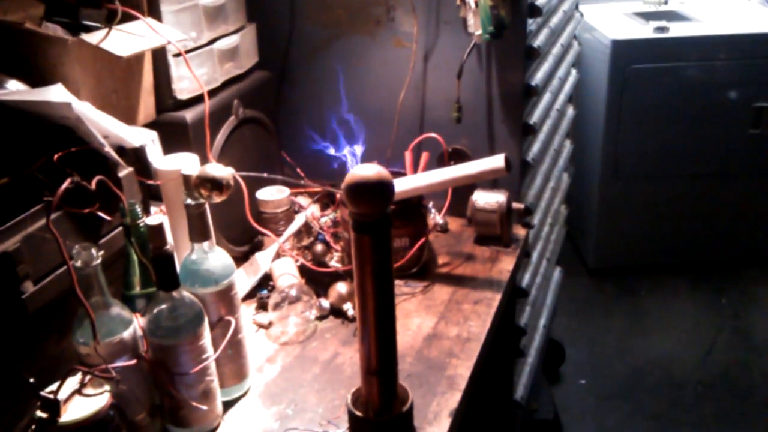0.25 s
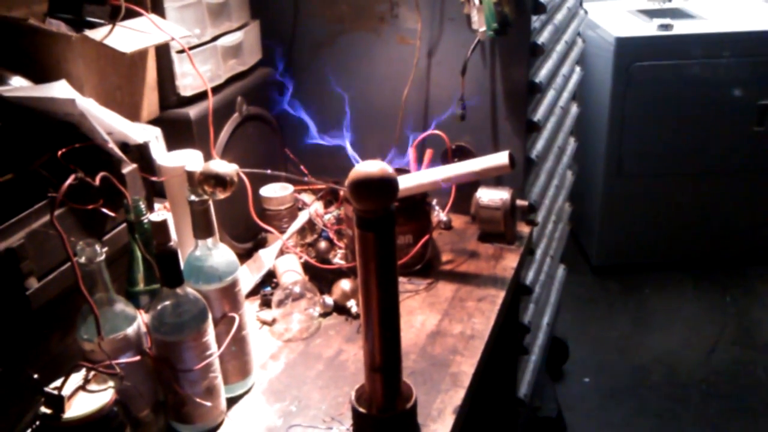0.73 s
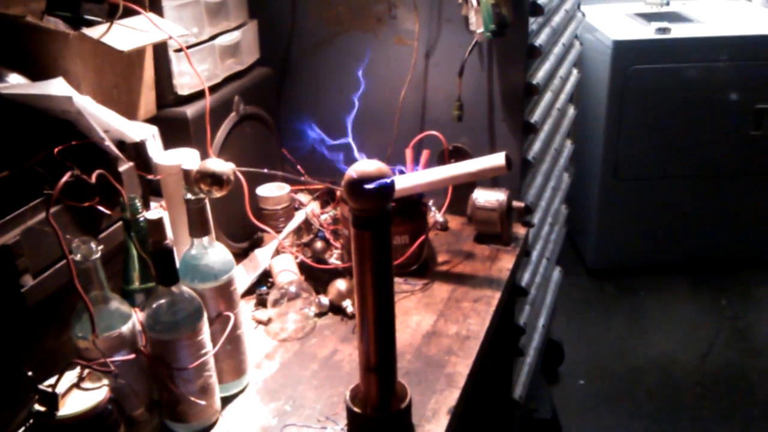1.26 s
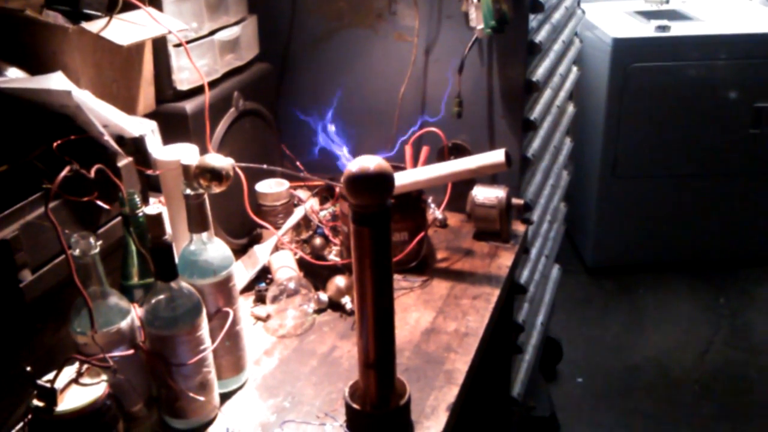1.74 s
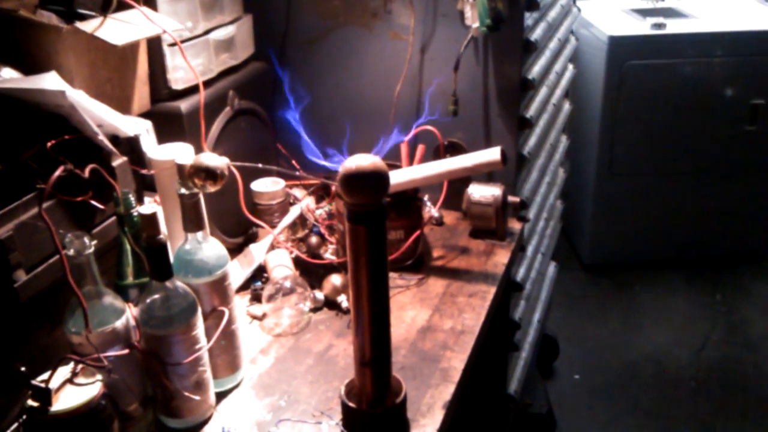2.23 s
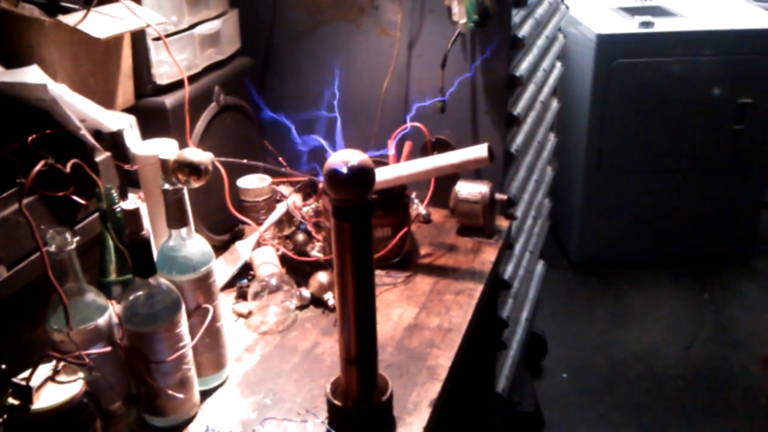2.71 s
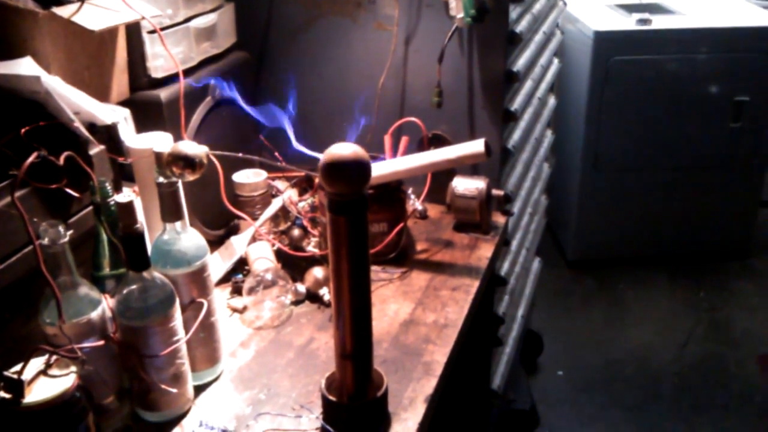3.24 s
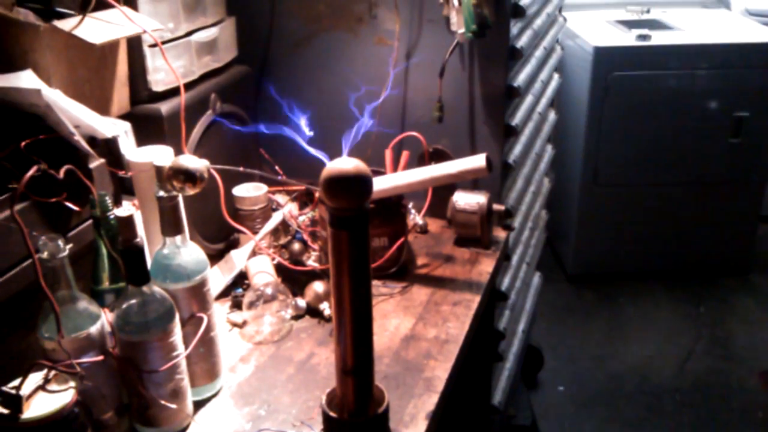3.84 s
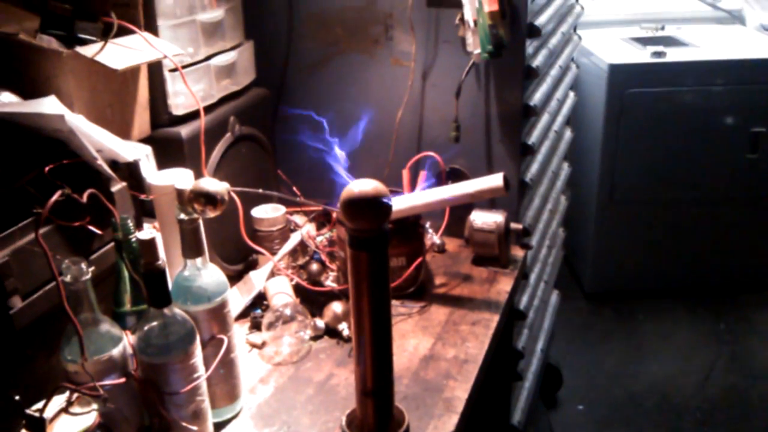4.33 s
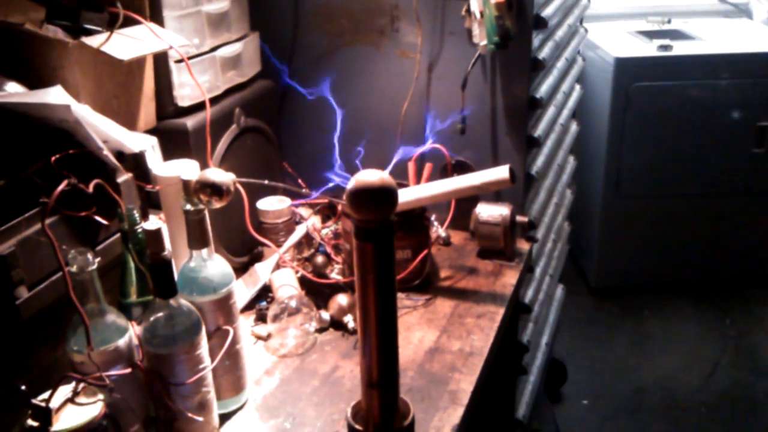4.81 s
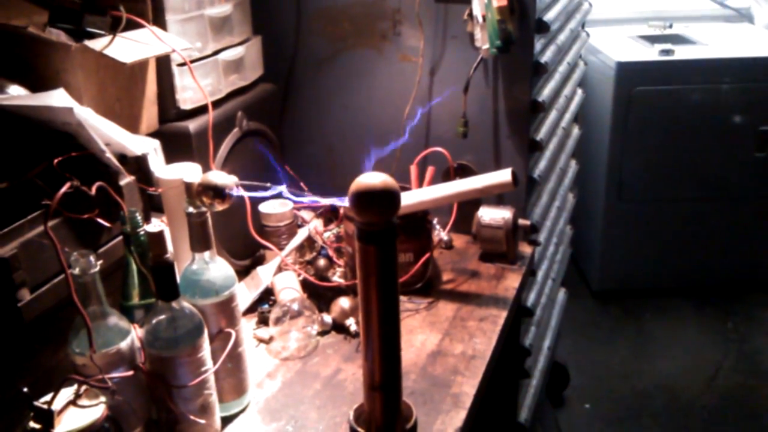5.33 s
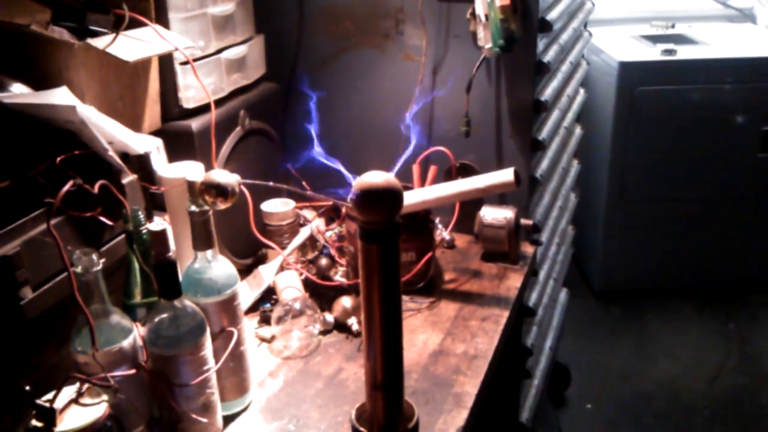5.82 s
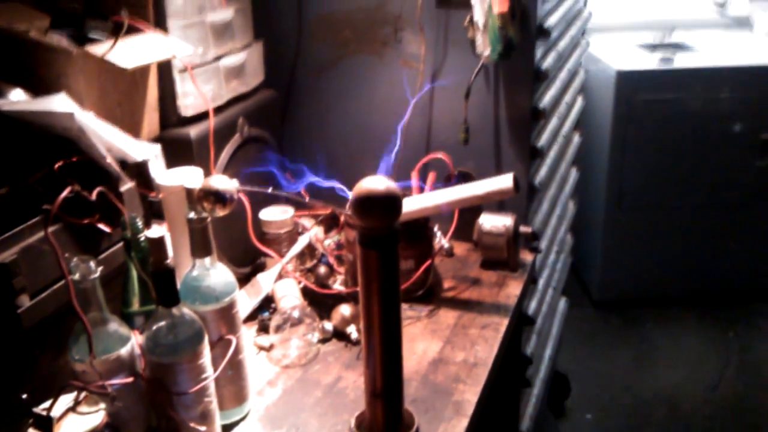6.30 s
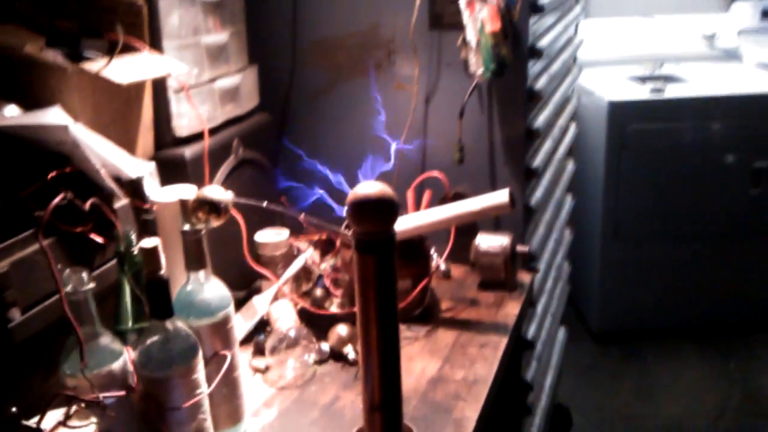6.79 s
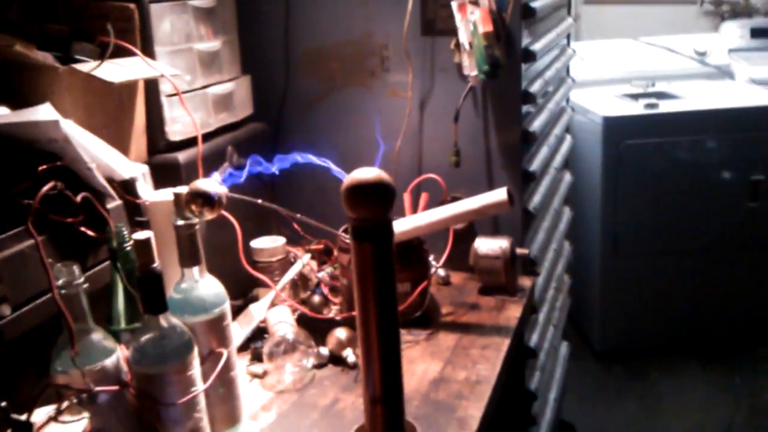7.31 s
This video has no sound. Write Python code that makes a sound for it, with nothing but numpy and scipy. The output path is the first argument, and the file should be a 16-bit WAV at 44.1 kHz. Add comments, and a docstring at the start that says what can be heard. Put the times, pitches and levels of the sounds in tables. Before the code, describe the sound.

Loud, sizzling electric arcs stream without a break from a nearby spark-gap coil in a workshop with a short, tight echo. A ragged, buzzing whine wavers within the hiss, sometimes racing for an instant, sometimes settling into a clearer tone. Irregular flares keep brightening the crackle, over faint knocking in the bench and a very faint hum. It is still running at the end.

```python
"""A small spark-gap coil runs on a workshop bench. From the start its gap fires unevenly, some 1400
times a second: a rasping whine. Each firing cracks along branching sparks in the air (streamers), making
a hiss, and missed firings knock in the bench over a faint rumble and hum. Streamers keep flaring up and
dying back. Just after half a second the gap briefly sings evenly, and at one second it briefly races.
Both come back now and then, and the longest even note comes near the end."""
import sys
import numpy as np
from scipy import signal
from scipy.fft import rfft, irfft, next_fast_len
from scipy.io import wavfile
from scipy.ndimage import uniform_filter1d

SR = 44100
rng = np.random.default_rng(int(sys.argv[2]) if len(sys.argv) > 2 else 0)


def unload_audio(sound):
    """Save the sound as a 16-bit wav file, at the path given as the first command line argument."""
    columns = np.transpose(np.atleast_2d(sound))
    # keep every value between -1 and 1, then stretch to whole-number steps
    steps = np.round(np.clip(columns, -1, 1) * 32767)
    wavfile.write(sys.argv[1], SR, steps.astype(np.int16))


N = 332955
TIME = np.arange(N) / SR

# how often the gap fires between flares: t/s, rate/Hz
FIRING_RATE = [(0, 1160), (.25, 1235), (.45, 1180), (.75, 1290), (1.1, 1370), (1.45, 1406), (1.7, 1527),
               (2.5, 1517), (2.72, 1340), (3.1, 1373), (4.1, 1290), (4.35, 1400), (5.1, 1346), (5.95, 1400),
               (6.05, 1540), (6.62, 1610), (7.0, 1437), (7.55, 1420)]
# how much the wait between firings varies: t/s, scatter/share of the wait
FIRING_SCATTER = [(0, 0.11), (.3, 0.086), (.65, .13), (.85, 0.077), (1.1, .12), (1.9, 0.097), (2.55, 0.093),
                  (2.9, 0.061), (3.5, 0.072), (4.3, .1), (4.95, .11), (5.12, 0.046), (5.5, .09),
                  (6.05, .12), (6.45, .1), (6.62, 0.059), (7.1, 0.077), (7.55, 0.059)]
# base loudness of the boom, the lower part of the whine: t/s, level/dB
BOOM_LEVEL = [(0.0, -28.5), (1.05, -25), (1.2, -29.5), (1.35, -24.5), (2.55, -27), (2.7, -37.5),
              (2.85, -32), (3.0, -20.1), (3.15, -30), (3.9, -25.5), (4.05, -30.5), (4.65, -26.5),
              (5.4, -29.5), (6.15, -32), (6.6, -23.5), (7.55, -25)]
# tone colour of the boom: f/Hz, level/dB
BOOM_SPECTRUM = [(500, -23), (900, -18), (1050, -6), (1250, -4), (1470, 1.5), (1680, 1), (1900, 1),
                 (2150, -3), (2500, -26), (4000, -62)]
# base loudness of the snap, the upper part of the whine: t/s, level/dB
SNAP_LEVEL = [(0.0, -29), (1.2, -24), (2.4, -30.5), (2.85, -26), (3.3, -30.5), (3.6, -24), (3.9, -27.5),
              (4.05, -26.5), (5.25, -29.0), (5.4, -26), (5.55, -30.5), (5.7, -24.5), (6.15, -36),
              (6.45, -26), (6.6, -33.5), (7.55, -25)]
# tone colour of the snap: f/Hz, level/dB
SNAP_SPECTRUM = [(1500, -36), (2100, -4), (2350, 1.5), (2620, 3), (2900, 1), (3200, -4.5), (3480, -9),
                 (3900, -7), (4600, -9), (5300, -9.5), (6200, -33), (9000, -50)]
# base loudness of the hiss: t/s, level/dB
HISS_LEVEL = [(0.0, -19), (1.05, -15.5), (1.2, -18), (1.5, -16), (1.65, -21), (3.6, -18.2), (3.75, -20.5),
              (3.9, -17.5), (4.2, -19.5), (5.7, -18.5), (5.85, -17), (6.0, -19.5), (6.9, -22),
              (7.55, -17.8)]
# tone colour of the hiss: f/Hz, level/dB
HISS_SPECTRUM = [(1500, -34), (3500, -16.5), (4900, -20), (5500, -9.5), (6100, -3.5), (6850, -0.5),
                 (7400, -2.5), (8300, 1.5), (9400, -6.5), (11500, -7), (13200, -12.5), (14300, -15),
                 (15000, -17), (16500, -19)]
# how much the thick branches stand out in the hiss: t/s, gain/dB
THICK_BRANCHES = [(0.0, 6), (0.45, 4.5), (0.6, 1.5), (1.95, 7.5), (2.55, -4.5), (2.7, 4.8), (4.05, -0.8),
                  (5.55, 3), (5.85, -8.5), (6.0, 0.7), (6.3, 3), (7.55, -4.5)]
# base loudness of the knocks of missed firings: t/s, level/dB
KNOCK_LEVEL = [(0, -50.5), (.7, -43.5), (1.15, -54), (1.5, -56), (2.2, -57.5), (3.2, -55.5), (3.37, -45),
               (3.6, -53), (4.3, -52.5), (5.15, -50.5), (5.55, -49.5), (5.92, -46), (6.1, -55), (6.45, -51),
               (6.65, -55.5), (7.05, -49), (7.2, -48), (7.55, -48)]
# tone colour of the knocks: f/Hz, level/dB
KNOCK_SPECTRUM = [(60, -35), (150, -29), (300, -10.5), (520, -5.5), (700, -3), (950, 8), (1300, 1.5),
                  (2500, -43)]
# notes at which the bench rings: f/Hz, width/Hz, level/dB
BENCH_RINGS = [(458, 40, 2.5), (587, 20, -6), (702, 48, 3.5), (770, 28, -5)]
# base loudness of the workshop's rumble: t/s, level/dB
RUMBLE_LEVEL = [(0, -78), (.35, -80), (.8, -67), (1.5, -78), (1.9, -75), (2.35, -73), (2.6, -75),
                (3.35, -68.5), (4.2, -72.5), (5.3, -70), (6.2, -71.5), (6.75, -68), (7.05, -77),
                (7.55, -65)]
# tone colour of the rumble: f/Hz, level/dB
RUMBLE_SPECTRUM = [(15, -12), (35, -4), (47, 1.5), (70, 1), (110, 1), (160, -1), (300, -6), (1000, -38)]
# loudness of the workshop's two tones: t/s, hum level/dB, whirr level/dB
HUM_AND_WHIRR_LEVELS = [(0, -88, -57), (.9, -78, -66), (1.7, -92, -59.5), (3, -86, -64), (5.5, -87, -72),
                        (6.5, -67, -74), (7.1, -72, -77), (7.55, -72, -77)]
# pitch of the whirr: f/Hz, width/Hz
WHIRR_BAND = (450, 43)
# what a flaring streamer adds: start/s, length/s, rate/Hz, hiss/dB, boom/dB, snap/dB, thick branches/dB
STREAMER_FLARES = [(-0.02, 0.15, 90.0, 3.5, 0.7, 5, 2), (0.227, 0.055, -0.0, 3, -2.5, -0.5, 2),
                   (0.472, 0.059, 30.0, -0.9, 1.5, 4, 0), (0.567, 0.095, -30.0, -0.6, 2, 4, 0),
                   (0.699, 0.065, -80.0, -0.3, 2.5, 1, 1), (0.808, 0.1, 0.0, 3.0, 3.5, 0.5, 4),
                   (1.227, 0.039, -50.0, 5.5, 1.5, 0.5, -1), (1.378, 0.14, -70.0, 0, -3.6, 1, 2),
                   (1.709, 0.068, 20.0, 2.5, 1.5, 0.5, 2), (1.914, 0.11, -20.0, 4, 0.2, 3.5, -0.5),
                   (2.022, 0.14, -40.0, 4.5, 0, 3.5, 0), (2.291, 0.094, -40.0, 4.5, -2.2, 1.0, 4.5),
                   (2.687, 0.13, 80.0, 3.5, 8, 1.5, -3), (2.873, 0.089, -10.0, 1.7, -2.2, 3.5, -6),
                   (2.965, 0.086, -20.0, 2.4, -4.5, 3.5, 1.4), (3.109, 0.074, 30.0, 4.5, 7.5, 7.5, 4),
                   (3.284, 0.17, 30.0, 3.5, 7.5, 3, 7), (3.569, 0.12, 90.0, 1.8, 3, 0.3, 4),
                   (3.751, 0.093, -30.0, 2.5, 2.3, 7.5, 7), (3.978, 0.077, 90.0, 3, 4.3, 3.9, 2),
                   (4.239, 0.048, 60.0, 2, 3.7, 1.5, 2), (4.442, 0.064, 30.0, 3.5, 4.1, 4.5, -7),
                   (4.662, 0.049, 10.0, 6.5, 4, 3.5, -3), (4.79, 0.085, 0.0, 3.9, 1, 3.2, -2),
                   (4.89, 0.095, -40.0, 2.5, 2.8, 4, 1), (5.048, 0.12, -20.0, 2.9, 5, 6.5, -4.5),
                   (5.239, 0.14, 30.0, 4.5, 3, 0, -5), (5.66, 0.1, 10.0, -1.6, 4, 0.2, 4),
                   (5.812, 0.15, -59.5, 4, 4, 6.5, 4.5), (6.084, 0.11, -30.0, 5.5, 6, 9, -3),
                   (6.374, 0.13, 49.5, 6, -0.3, 0.2, -8.5), (6.918, 0.049, -50.5, 7.5, 2.2, 6.5, 5.3),
                   (7.001, 0.17, -10.0, 4.5, 1, 0.3, 4), (7.224, 0.159, -30.5, 2.0, -2.5, 3.5, 0),
                   (7.43, 0.049, -7, 1.8, -2, 6.5, 4)]
# the gap settles to an even beat and sings: start/s, length/s, rate/Hz
EVEN_SPELLS = [(.56, 0.043, 1210), (2.009, 0.096, 1470), (2.62, 0.058, 1290), (2.831, 0.095, 1333),
               (3.359, 0.095, 1310), (3.471, 0.051, 1270), (3.749, .05, 1350), (4.879, 0.059, 1330),
               (5.051, .13, 1310), (5.27, .1, 1270), (6.338, .15, 1295), (6.93, 0.081, 1416),
               (7.229, .3, 1412)]
# the gap races and fires raggedly: start/s, length/s, extra rate/Hz, extra boom/dB
RACING_SPELLS = [(1.05, 0.074, 171, 3.5), (3.92, .05, 150, 0), (4.29, .06, 83, -2.5),
                 (5.2, 0.059, 128, 1.5), (6.15, 0.067, 90, 2.5), (6.27, 0.059, 39, 3.5),
                 (7.13, 0.083, 169, 3.5)]


def from_db(db):
    """Turn decibels into a number to multiply by."""
    return 10 ** (np.asarray(db) / 20)


def unit_level(x):
    """Scale a sound so its average level (rms) is 1."""
    return x / np.sqrt(np.mean(x ** 2) + 1e-20)


def in_time(rows):
    """Join a table's points with straight lines, giving a value at every sample."""
    seconds, *columns = np.transpose(rows)
    return np.squeeze([np.interp(TIME, seconds, column) for column in columns])


def drift(speed_hz):
    """Smooth random wandering with a typical size of 1."""
    step, warm_up = 40, 2000
    memory = np.exp(-2 * np.pi * step * speed_hz / SR)
    noise = rng.standard_normal(N // step + warm_up + 2)
    slow = signal.lfilter([1], [1, -2 * memory, memory * memory], noise)[warm_up:]
    return np.interp(np.arange(N) / step, np.arange(len(slow)), unit_level(slow))


def colour(x, spectrum):
    """Give a sound a tone colour that fades beyond the table's ends; its level comes out as 1."""
    size = next_fast_len(N + SR // 10)
    hz, db = np.transpose(spectrum)
    f = np.maximum(np.arange(size // 2 + 1) * SR / size, 1)
    gain = from_db(np.interp(np.log(f), np.log(hz), db))
    edge_fade = np.minimum(f / hz[0], 1) ** 2 * np.minimum(hz[-1] / f, 1) ** 2
    return unit_level(irfft(rfft(x, size) * gain * edge_fade, size)[:N])


def steady(x, samples):
    """Hold the slow level at 1 and keep the fast flutter."""
    return x / np.sqrt(uniform_filter1d(uniform_filter1d(x ** 2, samples), samples) + 1e-12)


def clicks(times, heights):
    """A row of clicks at the given seconds."""
    at = np.round(times * SR).astype(int)
    inside = (at >= 0) & (at < N)
    return np.bincount(at[inside], heights[inside], N)


def resonance(x, hz, width_hz):
    """Ring at one pitch; a narrower width rings longer."""
    return signal.lfilter(*signal.iirpeak(hz, hz / width_hz, SR), x)


def gap_firings(rate_hz, scatter, count=13000, sway_share=.5, sway_hz=70, lapse_share=.62, fitful=.9):
    """The capacitor charges until a spark jumps the gap; a longer wait stores a stronger spark."""
    # hot gas lingers in the gap, so whole runs of firings come early or late together
    charge = np.cumsum(rate_hz * np.exp(sway_share * scatter * drift(sway_hz))) / SR
    # most firings keep in step, a few slip badly: the whine turns ragged
    lapse = lapse_share * np.minimum(np.exp(fitful * rng.standard_normal(count) - fitful ** 2 / 2), 5)
    spread = np.interp(np.arange(count), charge, scatter) * lapse
    waits = np.exp(spread * rng.standard_normal(count) - spread ** 2 / 2)
    times = np.interp(np.cumsum(waits), charge, TIME, right=TIME[-1] + 1)
    return times, np.sqrt(waits)


def workshop_echo(x, places=8, roam_hz=6, fade_s=0.14, echo_db=2.5):
    """The direct sound, then dense echoes that change as the sparks roam from place to place."""
    t = np.arange(SR // 4) / SR
    nearness = np.array([drift(roam_hz) for _ in range(places)])
    nearness /= np.linalg.norm(nearness, axis=0)
    tails = rng.standard_normal((places, len(t))) * from_db(-60 * t / fade_s) * (t > .001)
    tails /= np.linalg.norm(tails, axis=1, keepdims=True)
    echoes = signal.oaconvolve(x * nearness, tails, axes=1).sum(axis=0)[:N]
    return x + from_db(echo_db) * echoes


def whine(times, strength, scatter_s, boom_db, snap_db, whip_s=.00004, flutter_db=2.5, waver_db=1.6):
    """The thick spark channel booms at the firing rate and the gap snaps at its overtones."""
    # an unsteady spark whips its channel about, which roughens the boom
    whip_delay = (whip_s + .6 * scatter_s) * drift(70)
    whipped = times + np.interp(times, TIME, whip_delay)
    out = np.zeros(N)
    parts = (whipped, boom_db, BOOM_SPECTRUM), (times, snap_db, SNAP_SPECTRUM)
    for arrivals, level_db, spectrum in parts:
        fluttering = clicks(arrivals, strength) * from_db(flutter_db * drift(70))
        buzz = steady(colour(workshop_echo(fluttering), spectrum), samples=1700)
        out += from_db(level_db + waver_db * drift(10)) * buzz
    return out


def streamer_cracks(times, strength, branches=4, lag_s=.00003, reach_s=.00013, flicker_db=3):
    """Each branch cracks at every firing; as the branches twist, their cracks mix in shifting colours."""
    # the air gives way a little sooner or later each time, so the cracks have no clear pitch
    crack_times = times + lag_s * rng.standard_normal(len(times))
    out = np.zeros(N)
    for _ in range(branches):
        delay = reach_s * np.interp(times, TIME, drift(4))
        heat = from_db(flicker_db * np.interp(times, TIME, drift(15)))
        out += clicks(crack_times + delay, strength * heat)
    return out


def streamer_hiss(times, strength, level_db, thick_db, glow_db=-9.5, tips_follow=0.54, waver_db=0.74):
    """Cracks over the smooth hiss of glowing air; thick branches sound duller, fine tips brighter."""
    cracks = steady(workshop_echo(streamer_cracks(times, strength)), samples=2400)
    glow = from_db(glow_db) * rng.standard_normal(N)
    hiss = colour(cracks + glow, HISS_SPECTRUM)
    thick = signal.sosfiltfilt(signal.butter(6, 7000, "low", fs=SR, output="sos"), hiss)
    tips = signal.sosfiltfilt(signal.butter(6, 9500, "high", fs=SR, output="sos"), hiss)
    hiss = hiss + (from_db(thick_db) - 1) * thick + (from_db(tips_follow * thick_db) - 1) * tips
    return from_db(level_db + waver_db * drift(14)) * steady(hiss, samples=1300)


def bench_knocks(times, flare_db, miss_share=.25, spread_db=6, gain_db=1, follow=0.39, waver_db=2.3):
    """A missed firing breaks the even beat: a low knock that rings in the bench."""
    missed = rng.random(len(times)) < miss_share
    heights = missed * from_db(spread_db * rng.standard_normal(len(times)))
    knocks = workshop_echo(clicks(times, heights), places=2)
    rings = sum(from_db(db) * resonance(knocks, hz, width_hz) for hz, width_hz, db in BENCH_RINGS)
    level_db = in_time(KNOCK_LEVEL) + gain_db + follow * flare_db + waver_db * drift(9)
    return from_db(level_db) * colour(knocks + rings, KNOCK_SPECTRUM)


def rumble(flare_db, gain_db=2, follow=0.88, waver_db=3):
    """Low, lumpy noise that swells with the flares."""
    level_db = in_time(RUMBLE_LEVEL) + gain_db + follow * flare_db + waver_db * drift(7)
    return from_db(level_db) * colour(rng.standard_normal(N), RUMBLE_SPECTRUM)


def hum_and_whirr(hum_hz=88.2, wander_hz=1.5):
    """A faint wavering tone hums and a narrow band of noise whirrs."""
    hum_db, whirr_db = in_time(HUM_AND_WHIRR_LEVELS)
    phase = 2 * np.pi * np.cumsum(hum_hz + wander_hz * drift(3)) / SR
    hum = from_db(hum_db) * unit_level(np.sin(phase))
    whirr = from_db(whirr_db) * unit_level(resonance(rng.standard_normal(N), *WHIRR_BAND))
    return hum + whirr


def swells(events, rise_s=.025, fade_s=.03):
    """Each flare or spell grows, holds and dies away; one curve per column after start and length."""
    out = np.zeros((len(events[0]) - 2, N))
    for start, length, *amounts in events:
        span = slice(*np.searchsorted(TIME, [start, start + length + 10 * fade_s]))
        age = TIME[span] - start
        shape = np.minimum(age / rise_s, 1) * np.exp(-np.maximum(age - length, 0) / fade_s)
        out[:, span] += np.outer(amounts, shape)
    return out


def even_singing(rate_hz, scatter, even_scatter=.044, wander_share=.008):
    """The gap sings when it settles near one rate and its firings scatter less."""
    even_hz, settled = swells([(*spell, 1) for spell in EVEN_SPELLS])
    pull_hz = even_hz * (1 + wander_share * drift(8)) - settled * rate_hz
    rate_hz = rate_hz + pull_hz / np.maximum(settled, 1)
    return rate_hz, scatter + np.minimum(settled, 1) * (even_scatter - scatter)


def racing(extra_scatter=.04):
    """The gap fires faster and more raggedly: changes in rate, boom level and scatter."""
    return swells([(*spell, extra_scatter) for spell in RACING_SPELLS])


def scene(hiss_gain_db=-0.06, boom_gain_db=0.16, snap_gain_db=1.02):
    """The same firings drive whine, hiss and knocks; flares and spells bend their pace and levels."""
    flare_hz, flare_db, flare_boom_db, flare_snap_db, flare_thick_db = swells(STREAMER_FLARES)
    race_hz, race_boom_db, race_scatter = racing()
    rate_hz = in_time(FIRING_RATE) + flare_hz + race_hz
    rate_hz, scatter = even_singing(rate_hz, in_time(FIRING_SCATTER) + race_scatter)
    times, strength = gap_firings(rate_hz, scatter)
    boom_db = in_time(BOOM_LEVEL) + boom_gain_db + flare_boom_db + race_boom_db
    snap_db = in_time(SNAP_LEVEL) + snap_gain_db + flare_snap_db
    hiss_db = in_time(HISS_LEVEL) + hiss_gain_db + flare_db
    mix = whine(times, strength, scatter / rate_hz, boom_db, snap_db)
    mix += streamer_hiss(times, strength, hiss_db, in_time(THICK_BRANCHES) + flare_thick_db)
    mix += bench_knocks(times, flare_db) + rumble(flare_db) + hum_and_whirr()
    return mix[None]


def record(dry, peak_limit=0.83, cutoff_hz=15740):
    """Flatten the rare tallest peaks, then steeply cut the highest treble."""
    treble_cut = signal.ellip(12, .1, 90, cutoff_hz, fs=SR, output="sos")
    return signal.sosfilt(treble_cut, np.clip(dry, -peak_limit, peak_limit))


dry = scene()
out = record(dry)
unload_audio(out)
```